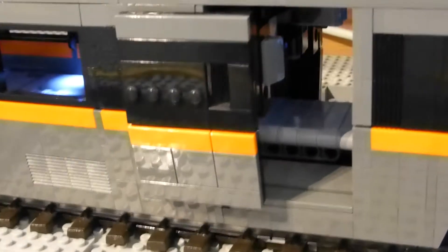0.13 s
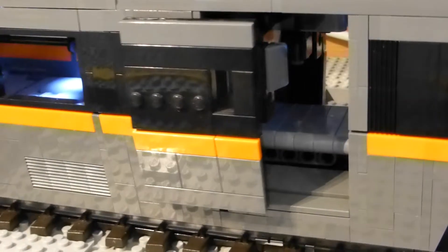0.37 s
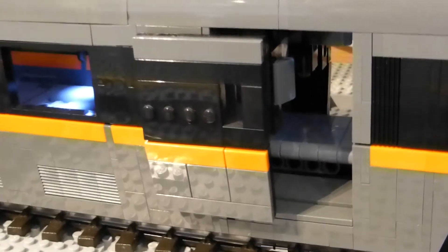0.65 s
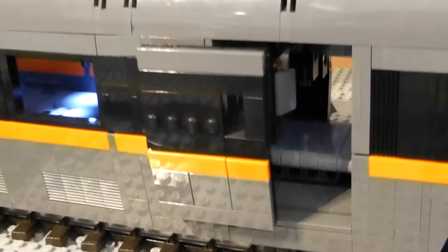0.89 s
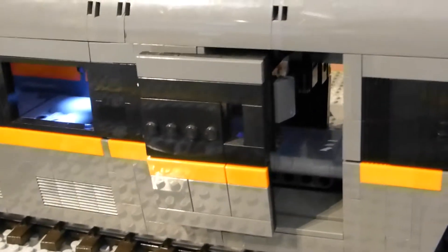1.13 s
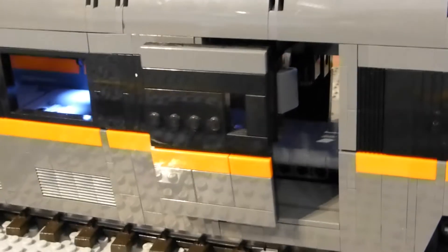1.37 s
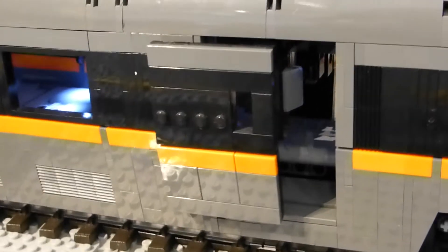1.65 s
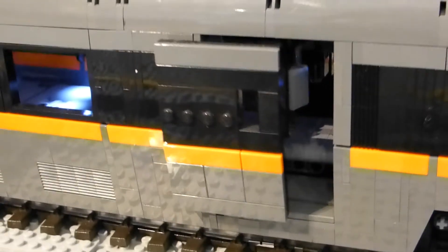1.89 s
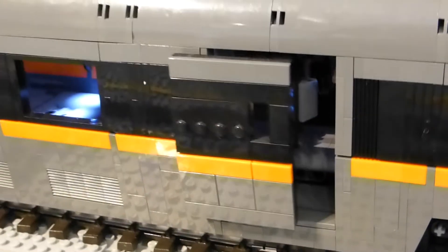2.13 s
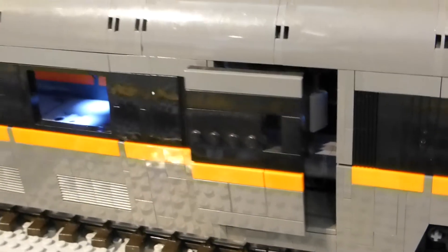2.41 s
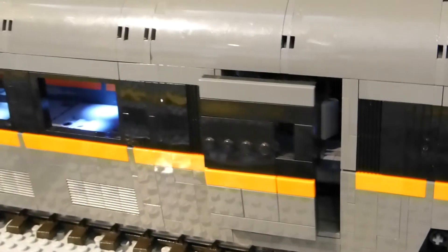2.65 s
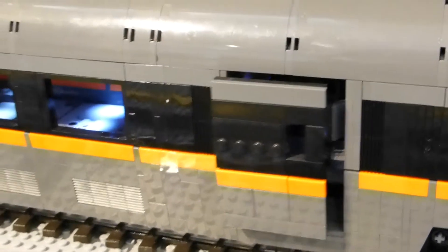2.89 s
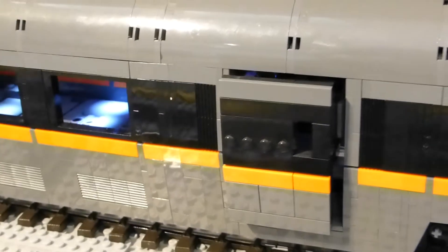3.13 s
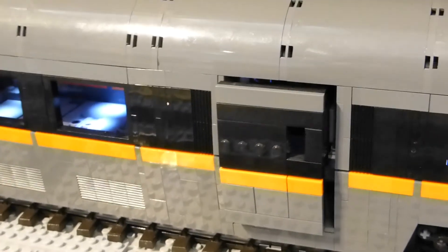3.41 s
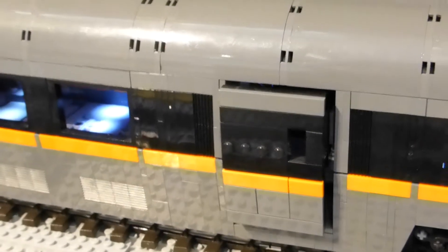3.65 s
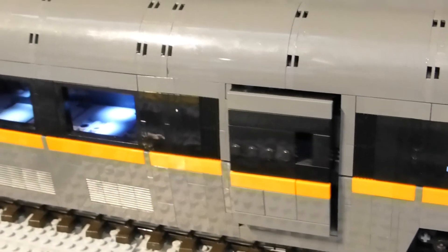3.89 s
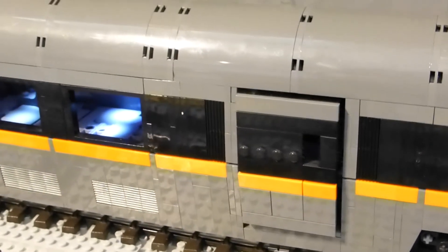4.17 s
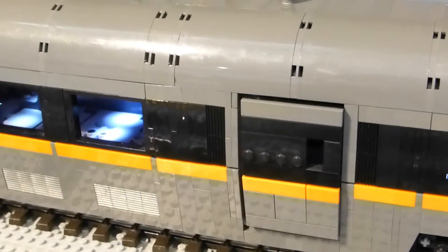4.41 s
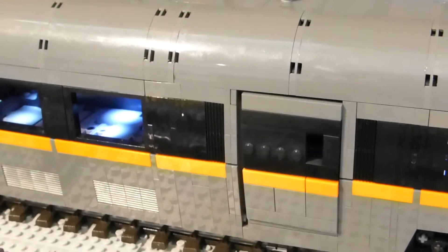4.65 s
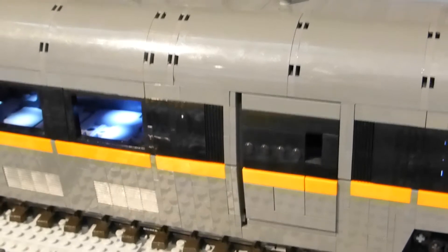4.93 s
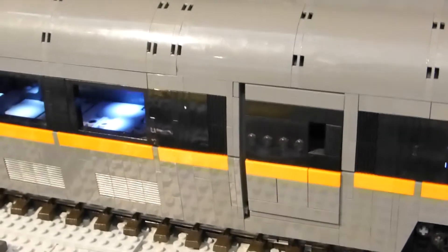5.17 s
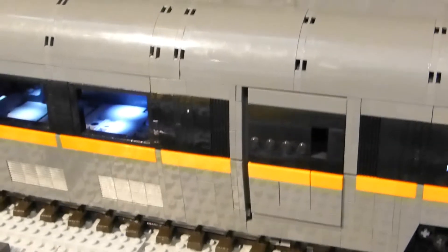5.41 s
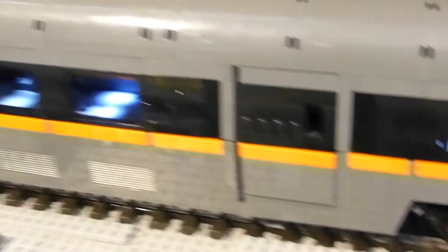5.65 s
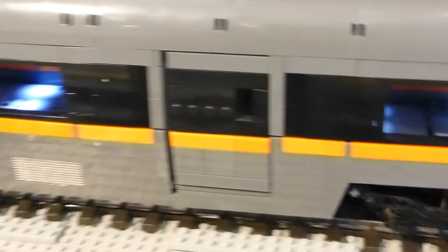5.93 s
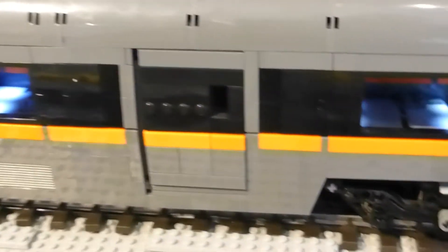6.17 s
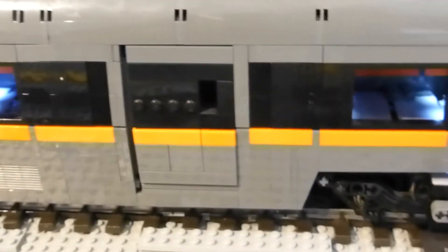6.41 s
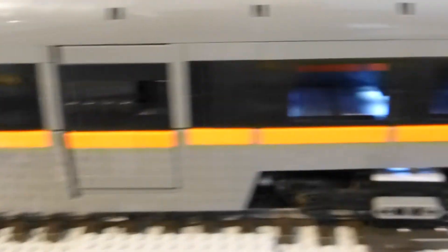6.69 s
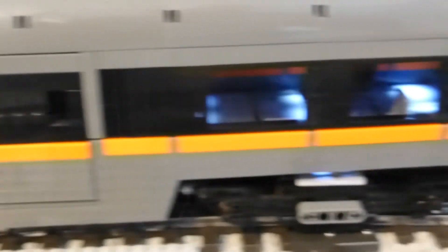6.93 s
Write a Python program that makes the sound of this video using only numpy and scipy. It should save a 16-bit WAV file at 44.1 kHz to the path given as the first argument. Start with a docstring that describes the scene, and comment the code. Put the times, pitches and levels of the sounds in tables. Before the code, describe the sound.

A small electric motor whines, stops, then whines again as a plastic model train door slides shut with clicks, followed by light plastic knocks indoors.

```python
"""A small geared motor is already whining in a plastic model carriage; it pauses, then runs again to slide a door shut.
Periodic tooth meshing makes shaft orders whose slowly drifting pattern sings through the plastic body, with brush
and gear hiss. Speed wavers with load, and races then drags at each tight spot of a slower gear.
Struck plastic modes tick, dead blows thump and thin snaps crack, over a quiet indoor hush of filtered noise."""
import sys
import numpy as np
from scipy import signal
from scipy.fft import rfft, irfft
from scipy.io import wavfile
from scipy.ndimage import uniform_filter1d

SR = 44100
rng = np.random.default_rng(int(sys.argv[2]) if len(sys.argv) > 2 else 0)


def transcribe(u):
    """Save the signal u as a 16-bit wav file named by the first command-line argument.

    u: samples, shape (n,) or (channels, n), limited to [-1, 1]; the rate is SR.
    q: integer samples, one column per channel.
    """
    v = np.clip(np.atleast_2d(u).T, -1, 1)
    q = np.round(v * 32767).astype(np.int16)
    wavfile.write(sys.argv[1], SR, q)


def to_linear_factor(level_db):
    """Convert decibel levels (scalar or array-like) to linear amplitude factors."""
    exponent = np.asarray(level_db, float) / 20
    return 10 ** exponent


N = 310905


def motor():
    """Rotating source: one shaft phase drives both the tooth whine and the tonal hum."""
    t = np.arange(N) / SR
    speed, power_db, shaft_db = powered_runs(t)
    hz, rough = loaded_shaft(t, speed)
    surge_db, lower_db = whine_levels(t)
    drive_db = WHINE_DB + power_db + surge_db
    turns = np.cumsum(hz * (1 + 0.006 * wander(24.46, count=1)[0])) / SR
    turn = np.exp(2j * np.pi * turns)
    gears = door_shading(t, wall_panels(t, carriage_body(t, turns, turn, rough)))
    lower = signal.sosfiltfilt(signal.butter(3, 1750, fs=SR, output="sos"), gears)
    # each part is levelled over 2500 samples before its own level is applied
    upper, lower = [p / np.sqrt(uniform_filter1d(p ** 2, 2500) + 1e-9) for p in (gears - lower, lower)]
    whine = to_linear_factor(drive_db) * (upper + to_linear_factor(lower_db) * lower)
    tones = order_hum(t, turn, speed, rough, drive_db, shaft_db) + chassis_shudder(t)
    # too small a body to radiate bass
    return signal.sosfilt(signal.butter(4, 105, "high", fs=SR, output="sos"), whine + tones)


# Spells of motor power: [power on t/s, power off t/s, coasting time t/s, once-a-turn hum level/dB]
RUNS = [(-.5, .41, .14, -54.5), (.93, 4.815, .185, -58.5)]
SPIN_UP_S, COAST_CURVE = .03, 1.9  # time constant of the climb; power of the coasting time
POWERED_DB, COASTING_DB = 32, 66  # whine level change per decade of speed


def powered_runs(t):
    """Rotor inertia: speed climbs exponentially under power and falls as a power law when coasting."""
    speed, power_db, shaft_db = np.full(N, 1e-4), np.full(N, -200.), np.zeros(N)
    for on, off, coast, db in RUNS:
        shaft_db[t >= on] = db
        up = np.clip(1 - np.exp(-(t - on) / SPIN_UP_S), 1e-4, 1)
        down = np.clip(1 - np.clip((t - off) / coast, 0, 1) ** COAST_CURVE, 1e-4, 1)
        speed = np.maximum(speed, up * down)
        power_db = np.maximum(power_db, POWERED_DB * np.log10(up) + COASTING_DB * np.log10(down))
    return speed, power_db, shaft_db


# Shaft speed under the changing load of the door: [t/s, shaft turns f/Hz]
CRUISE = [(0.04, 159.6), (0.21, 150.9), (0.42, 155.4), (1.05, 150.3), (1.26, 143.6), (1.64, 147.5),
          (1.81, 150), (2.16, 153.8), (2.52, 151.4), (2.68, 160.7), (2.96, 151), (3.3, 148.6),
          (3.48, 140.4), (3.86, 146.1), (4.13, 150.1), (4.36, 160.1), (4.51, 152), (4.63, 158.3),
          (4.88, 149.1)]
# A tight spot on a slower gear, round about every .29 s: [t/s, drag f/Hz, racing just before f/Hz]
CATCHES = [(0.098, 5, 2), (0.383, 10.5, 4.5), (1.141, 9.5, 7.0), (1.435, 1.75, 10), (1.737, -0.5, 6.5),
           (2.007, 5.5, 0.0), (2.285, 5.5, 0.5), (2.596, 3, 2.5), (2.862, 11, 0.5), (3.144, 15, 2.5),
           (3.432, 11, 0.6), (3.735, 7, 6), (4.036, 3, 10), (4.317, 5.5, 4.5), (4.706, 15.5, -0.5)]
DRAG_S, RACE_S, RACE_LEAD_S = .03, .028, .045
ROUGH, ROUGH_PER_HZ, ROUGH_SLOW = .2, 0.02223, 2.43  # steady, per Hz of catch, per share of lost speed
JAM_S, JAM_ROUGH = 4.69, 0.36  # the door seats and the gears grind from here on


def loaded_shaft(t, speed):
    """Load modulation: catches race and drag the shaft and roughen its running."""
    drag = sum(hz * bump(t, s, DRAG_S) for s, hz, _ in CATCHES)
    race = sum(hz * bump(t, s - RACE_LEAD_S, RACE_S) for s, _, hz in CATCHES)
    rough = ROUGH + ROUGH_PER_HZ * (drag + race) + ROUGH_SLOW * (1 - speed) + JAM_ROUGH * (t > JAM_S)
    hz = speed * (np.interp(t, *np.transpose(CRUISE)) - drag + race)
    return hz, np.clip(rough, 0, .9)


# Brief swells and dips of the whine: [t/s, half length t/s, level/dB]
SURGES = [(0.028, 0.04, 2.5), (0.212, 0.017, -2.5), (0.37, 0.086, 2.5), (1.166, 0.02, -3.5),
          (1.27, 0.12, 1), (1.48, 0.032, 3.5), (1.617, 0.009, -5), (1.825, 0.027, 3), (2.069, 0.035, 1),
          (2.229, 0.1, -2), (2.348, 0.011, -4), (2.515, 0.029, -3.5), (2.555, 0.018, 7),
          (2.596, 0.076, -4.5), (2.73, 0.041, 2.5), (2.834, 0.02, 3.5), (2.92, 0.11, -3), (3.102, 0.058, 2),
          (3.4, 0.0082, 2.5), (3.463, 0.035, -3.5), (3.822, 0.021, 3.5), (3.867, 0.012, -3.5),
          (3.895, 0.028, 2.5), (3.962, 0.027, -3.5), (4.062, 0.024, 3.5), (4.26, .015, 3),
          (4.36, 0.021, -2), (4.563, 0.075, -4), (4.702, 0.026, 4), (4.834, 0.01, 2.5),
          (4.745, 0.044, -3.5), (4.938, 0.014, 2.5), (4.883, .002, 0), (4.891, 0.0019, 4),
          (4.907, 0.0018, 9), (4.923, 0.0028, 5), (4.926, 0.0036, 1), (4.953, 0.0044, -1)]
WHINE_DB, WHINE_WAVER_DB = -28.5, 1.11
LOWER_DB, LOWER_FOLLOWS, LOWER_WAVER_DB = -4.5, 0.54, 2  # under 1.75 kHz; follows surges only partly
SHUT_S, SHUT_DB = 3.14, -2.5  # the lower part weakens as the door comes to cover the opening


def whine_levels(t):
    """Amplitude modulation: local humps and slow chance wavering, partly shared by the lower band."""
    waver = wander(27.5, count=2)
    surge_db = sum(db * bump(t, s, half_s) for s, half_s, db in SURGES) + WHINE_WAVER_DB * waver[0]
    lower_db = LOWER_DB + np.where(t > SHUT_S, SHUT_DB, 0)
    lower_db = lower_db + (LOWER_FOLLOWS - 1) * surge_db + LOWER_WAVER_DB * waver[1]
    return surge_db, lower_db


EVENNESS, EVEN_ORDER = .2, 70  # 0 = some orders stand far out, 1 = all equal; grows by 1 over 70 orders


def tooth_mesh(t, turn, rough):
    """Fourier synthesis: 90 shaft orders carry a tooth pattern that drifts, and blurs when rough."""
    frames, rough_frames = np.arange(0, N + 64, 64) / SR, np.append(rough[::64], 0)
    rough_frames = rough_frames[:len(frames)]
    order = np.arange(90)
    z = rng.standard_normal((4, len(frames), 90))
    z = z + 0.17 * np.roll(z, 1, axis=2)  # neighbouring orders move together: a soft beat once a turn
    slow = smooth_frames(z[0] + 1j * z[1], 5)
    slip = np.cumsum(1.3 + 10 * rough_frames ** 2)  # the pattern moves faster when the mesh jolts
    slow = np.r_[slow, slow[::-1]][(slip % (2 * len(frames))).astype(int)]
    slow = slow / abs(slow) ** np.clip(EVENNESS + order / EVEN_ORDER, 0, 1)
    fast = smooth_frames(z[2] + 1j * z[3], 40)
    loose = np.clip(rough_frames[:, None] * (0.45 + (order / 23) ** 2), 0, 1)  # high orders blur first
    pattern = np.sqrt(1 - loose) * slow / abs(slow).mean()
    pattern = pattern + .5 * np.sqrt(loose) * fast / abs(fast).mean()
    chatter = smooth_frames(rng.standard_normal(pattern.shape), 12)
    pattern *= to_linear_factor(2.24 * evened(uniform_filter1d(chatter, size=4)))  # groups of orders flare up briefly
    teeth, carrier = np.zeros(N), np.ones(N, complex)
    for column in pattern.T:
        carrier = carrier * turn
        teeth += (carrier * np.interp(t, frames, column)).real
    return evened(teeth)


def smooth_frames(z, cutoff_hz):
    """Low-pass smoothing of curves sampled every 64 samples."""
    b, a = signal.butter(2, cutoff_hz * 128 / SR)
    return signal.filtfilt(b, a, z, axis=0, padtype="even", padlen=600)


TOOTH_DB, TOOTH_SPREAD_DB = -6, 3.5  # level against the mesh; spread of single teeth
TOOTH_DRIFT, TOOTH_JITTER = .17, .003  # slow shift in turns; quick shift in turns at 150 Hz


def tooth_clicks(turns, count=3):
    """Once-per-turn impulses: proud teeth strike at places that creep round; each comes and goes."""
    out, chance = np.zeros(N), rng.standard_normal((count, 2, N))
    creeps, strengths = wander(1.5, count), wander(10.4, count)
    for k, (creep, strength, (shift, size)) in enumerate(zip(creeps, strengths, chance)):
        at = np.flatnonzero(np.diff(np.floor(turns + k / count + TOOTH_DRIFT * creep)))
        late = np.clip(at + (TOOTH_JITTER * shift[at] * SR / 150).astype(int), 0, N - 1)
        out[late] -= to_linear_factor(TOOTH_SPREAD_DB * np.minimum(strength[at], 1.5) + np.clip(size[at], -2, 2))
    return out - out.mean()


# Brush and gear hiss relative to the body colour: [f/Hz, level/dB]
RATTLE = [(100, 14), (400, 8), (1000, -2.5), (2500, 1), (5000, 9), (10000, 5.5), (15400, 4)]


def brush_hiss(turn):
    """Modulated noise: friction hiss gated once a turn and in uneven bursts of grinding."""
    gate = (1 + 0.031 * turn.real) * to_linear_factor(0.91 * wander(79, count=1)[0])
    return colour(gate * rng.standard_normal(N), RATTLE)


# What the carriage radiates: [f/Hz, level/dB]
BODY = [(150, -37), (400, -27.5), (700, -7), (1200, -4.5), (1700, -4), (2300, 0), (2750, -8.5), (3100, -13),
        (3700, -13), (4150, -11.5), (4700, -12.5), (5250, -14.5), (6400, -17), (7200, -18), (8000, -17.5),
        (10000, -18), (11500, -30), (15200, -32), (15450, -67)]


def carriage_body(t, turns, turn, rough):
    """Source and filter: the plastic body colours teeth and hiss; rough running favours hiss."""
    teeth = tooth_mesh(t, turn, rough) + to_linear_factor(TOOTH_DB) * evened(tooth_clicks(turns))
    share = np.clip(0.1 + 0.5 * rough, 0, 1)  # power share of the hiss
    hiss = evened(colour(brush_hiss(turn), BODY))
    return np.sqrt(1 - share) * evened(colour(teeth, BODY)) + np.sqrt(share) * hiss


# Narrow resonances and dips of the plastic walls:
# [f/Hz, width f/Hz, door open level/dB, door over the gears level/dB]
PANELS = [(899, 75, -5, -2), (1377, 95, 7, 6), (1561, 70, 6.5, 3.5), (1702, 64, -14.5, -3),
          (1822, 370, 8, 3.5), (2057, 66, 4, 4), (2356, 200, 1.5, 4), (2680, 260, 6.5, 3),
          (2784, 103, -9.5, 2), (2964, 110, 7.5, 1.5), (3260, 130, 5.5, 3), (3865, 210, -6, 0),
          (3990, 145, 6, 1), (4200, 51, 2, 9.5), (4500, 150, -1, -4), (5205, 170, 1.5, 7),
          (5430, 65, 7.5, -8), (6410, 120, 6.5, 5.5), (6700, 100, 2, 8.5), (6670, 74, 5, -4.5),
          (6930, 190, -4, -6), (7850, 140, 3.5, 5.5)]
# The door slides over the gears: [start t/s, end t/s]
COVER_S = (2.3, 3.9)


def wall_panels(t, gears):
    """Panel resonance: Lorentzian peaks and dips cross-fade from open door to covered gears."""
    grid_hz = np.arange(50, 16000, 15.)
    peaks_db = sum(np.outer(db, 1 / (1 + (2 * (grid_hz - f) / width) ** 2)) for f, width, *db in PANELS)
    covered = np.interp(t, COVER_S, (0, 1))
    shares = (1 - covered, covered)
    return sum(share * colour(gears, np.c_[grid_hz, db]) for share, db in zip(shares, peaks_db))


# Treble gain of the whine, dulling after 2 s as the door closes over the gears: [t/s, level/dB]
SHINE = [(0, 1.5), (.5, 1), (2, 5), (3, 0), (5, -0.5)]
# Bands whose brightness changes as the door slides over the gears:
# [low f/Hz, high f/Hz, before level/dB, after level/dB, change t/s]
RASPS = [(2570, 3160, 6, 3, 2.28), (2200, 2650, 0.5, 2, 3.9), (4730, 5100, 0, 2, 2.6)]
RASP_FADE_S = 0.043  # half length of each change


def door_shading(t, gears):
    """Time-varying filtering: the treble and three narrower bands change level as the door moves."""
    treble = signal.sosfiltfilt(signal.butter(3, 2550, "high", fs=SR, output="sos"), gears)
    gears = gears + (to_linear_factor(np.interp(t, *np.transpose(SHINE))) - 1) * treble
    for low_hz, high_hz, before_db, after_db, s in RASPS:
        band = signal.butter(2, (low_hz, high_hz), "band", fs=SR, output="sos")
        rasp = signal.sosfiltfilt(band, gears)
        gain_db = np.interp(t, (s - RASP_FADE_S, s + RASP_FADE_S), (before_db, after_db))
        gears = gears + (to_linear_factor(gain_db) - 1) * rasp
    return gears


# Shaft orders heard as tones: [multiple of the shaft turns]
HUM_ORDERS = (2, 3, 4, 5, 6, 7, 8, 10, 12, 14, 17)
# Resting level of each of those orders: [level/dB]
HUM_DB = (-60.5, -62, -50, -50, -60, -53.5, -67, -60, -55, -52, -54)
# Moments when one order stands out, a table per order: [t/s, half length t/s, level/dB]
FLARES = [
    [(1.277, 0.089, -53), (2.494, 0.12, -57.5), (3.47, 0.062, -53), (3.78, 0.3, -59), (4.121, 0.065, -57),
     (4.705, 0.024, -43.5)],
    [(3.3, 0.2, -64), (4.1, 0.062, -55)],
    [(.12, 0.21, -48.5), (.309, 0.025, -38.5), (2.075, 0.062, -44.5), (2.55, 0.016, -34),
     (2.64, 0.048, -36), (2.814, 0.022, -38.5), (3.05, 0.088, -52), (4.01, 0.016, -41),
     (4.639, 0.03, -34.5)],
    [(1.307, 0.029, -51), (1.6, 0.33, -55), (2.12, 0.016, -45), (2.654, 0.016, -42), (3.68, 0.081, -48),
     (3.85, 0.048, -44), (4.045, 0.033, -39), (4.49, 0.031, -43), (4.8, 0.04, -44)],
    [(2.72, 0.022, -52.5), (3.27, 0.058, -44.5), (3.86, 0.053, -61)],
    [(.309, 0.27, -46), (1.09, 0.012, -40), (1.28, 0.044, -42), (1.8, 0.079, -50), (2.095, 0.019, -32),
     (2.434, 0.068, -33.5), (2.744, 0.073, -41), (3.03, 0.069, -41), (3.54, 0.042, -50), (4.39, 0.051, -44),
     (4.629, 0.031, -38)],
    [(1.48, 0.026, -42), (2.09, 0.11, -39.5), (2.93, 0.017, -66), (4.4, 0.089, -42)],
    [(1.06, 0.019, -30.5), (1.77, 0.046, -39), (3.08, .03, -36)],
    [(.11, 0.028, -32), (.425, .025, -36), (1.77, .03, -38), (2.1, 0.035, -29), (3.08, .03, -38),
     (4.4, 0.023, -35)],
    [(.1, 0.023, -29), (1.26, 0.015, -49), (3.08, 0.038, -29.5)],
    [(.03, 0.017, -24), (.17, 0.034, -37)],
]
HUM_WAVER_DB, HUM_SLOW_DB = 3, 105  # slow wavering; loss per decade of speed


def order_hum(t, turn, speed, rough, drive_db, shaft_db):
    """Harmonics of rotation: low shaft orders sound as tones, broken up by rough running."""
    flutters = 7 * rough * wander(37, count=len(HUM_ORDERS))
    drifts = wander(3.6, count=len(HUM_ORDERS))
    hum = np.zeros(N)
    for k, db, flares, drift, flutter_db in zip(HUM_ORDERS, HUM_DB, FLARES, drifts, flutters):
        level = to_linear_factor(db + HUM_WAVER_DB * drift)
        level = level + sum(to_linear_factor(top_db) * bump(t, s, half_s) for s, half_s, top_db in flares)
        order_db = 20 * np.log10(level) + HUM_SLOW_DB * np.log10(speed)
        hum += np.sqrt(2) * to_linear_factor(order_db + flutter_db) * (turn ** k).imag
    once_db = shaft_db + .5 * (drive_db + 26) - 3 * rough + 1.5 * wander(8, count=1)[0]
    return hum + np.sqrt(2) * to_linear_factor(once_db) * turn.imag


# Chassis shudder at part speed:
# [f/Hz, level/dB, after power on t/s, after power off t/s, half length t/s]
SHUDDER = (243, -50.5, .05, .066, .022)


def chassis_shudder(t):
    """Resonance in passing: a fixed tone swells briefly after each power on and off."""
    hz, db, after_on, after_off, half_s = SHUDDER
    swell = sum(bump(t, on + after_on, half_s) + bump(t, off + after_off, half_s) for on, off, *_ in RUNS)
    return np.sqrt(2) * to_linear_factor(db + 2.5 * wander(25, count=1)[0]) * swell * np.sin(2 * np.pi * hz * t)


# Ticks and knocks of plastic parts:
# [t/s, overall level/dB, struck place f/Hz, bright crack relative level/dB]
TICKS = [(0.572, -49, 5900, 5), (0.755, -49, 1640, 2), (0.829, -40.5, 1660, 0.5), (4.994, -50, 1660, 6),
         (5.057, -48.5, 222, -37), (5.224, -43, 1430, 1), (5.231, -35.5, 3180, 3.5), (5.25, -36, 425, -18),
         (5.307, -47, 2180, 4), (5.341, -39.5, 964, -6), (5.344, -35, 3040, 1.5), (5.347, -36, 2140, -15),
         (5.3705, -42, 2800, 2), (5.885, -53, 4200, 4), (5.985, -46, 5900, -3), (6.0112, -42, 2900, -4),
         (6.535, -30.5, 547, -6.5), (6.5373, -37, 2860, 0), (6.5367, -25, 413, -5.5),
         (6.549, -32, 530, -31), (6.596, -47, 4100, -3), (6.574, -36, 416, -20), (6.588, -36, 2700, -2.5),
         (6.593, -33, 158.4, -30), (6.5933, -44, 2840, -1), (6.606, -50, 3040, 3), (6.749, -32, 423, -8),
         (6.7483, -41, 2200, -8), (6.751, -38, 4200, -6), (6.756, -45, 170, -25), (6.766, -53, 4200, -9),
         (6.838, -52, 2200, 3), (6.845, -45, 179, -30), (6.868, -49, 172, -30)]
# Modes of the plastic shell, struck at different places: [f/Hz, level/dB, 60 dB decay t/s]
SHELL = [(170, 0.5, 0.15), (222, 5, 0.076), (364, -1.5, .05), (425, -3.5, 0.072), (539, 3, 0.056),
         (660, 1, .04), (964, 7.5, 0.018), (1430, 4.5, 0.052), (1660, 4.5, 0.024), (2200, -0.5, 0.026),
         (2700, -8, .03), (2900, -4, 0.02), (3040, 1, 0.019), (4200, -8, .03), (5900, -3, .03)]
REACH_OCTAVES, SOFT_CYCLES = 0.085, 0.9  # how far from the struck place modes answer; rise of the ring
PUFF_DB, PUFF_DB_PER_OCTAVE = -4.5, -9  # dull puff of a tick at 500 Hz, weaker away from it


def ticks():
    """Modal impact: each tick rings shell modes near the struck place, with a puff and a crack."""
    out, t = np.zeros(N + 6000), np.arange(6000) / SR
    noise = rng.standard_normal((len(TICKS), 6000))
    dull = signal.sosfilt(signal.butter(3, (280, 900), "band", fs=SR, output="sos"), noise)
    dull = dull * to_linear_factor(-60 * t / 0.079)
    bright = signal.sosfilt(signal.butter(2, (900, 5000), "band", fs=SR, output="sos"), noise)
    bright = bright * (to_linear_factor(-60 * t / 0.015) + to_linear_factor(-10.0 - 60 * t / 0.12))
    mode_hz, mode_db, t60 = np.transpose(SHELL)[:, :, None]
    modes = to_linear_factor(mode_db - 60 * t / t60) * np.sin(2 * np.pi * mode_hz * t)
    modes = modes * np.minimum(t * mode_hz / SOFT_CYCLES, 1)
    for (s, level_db, hz, bright_db), puff, crack in zip(TICKS, dull, bright):
        ring = bump(np.log2(mode_hz[:, 0] / hz), 0, REACH_OCTAVES) @ modes
        dull_db = PUFF_DB + PUFF_DB_PER_OCTAVE * abs(np.log2(hz / 500))
        tick = ring + to_linear_factor(dull_db) * puff / abs(puff).max() + to_linear_factor(bright_db) * crack / abs(crack).max()
        out[round(s * SR):][:6000] += to_linear_factor(level_db) * tick * np.minimum(t / .001, 1)
    return signal.sosfilt(signal.butter(2, 110, "high", fs=SR, output="sos"), out[:N])


# Short dry thumps: [t/s, starting level/dB, f/Hz, 60 dB decay t/s]
THUMPS = [(4.73, -36, 480, 0.037), (4.845, -37, 400, .04), (4.994, -37, 1304, .008),
          (4.928, -33.5, 560, 0.056), (4.946, -34, 710, 0.022), (4.9952, -32, 476, 0.017),
          (5.0178, -30, 600, 0.012), (5.059, -39, 389, 0.024)]
# Thin bright snaps: [t/s, nominal level/dB, 60 dB decay t/s]
SNAPS = [(4.9273, -27, 0.052), (4.9945, -42, .008), (5.2244, -37, 0.018), (5.2305, -31, 0.035),
         (5.3424, -48, .03), (5.9848, -41, 0.024), (6.5365, -35, 0.033)]


def thumps():
    """Heavy damping: dead blows are fast-dying sines, thin snaps are fast-dying treble noise."""
    out, t = np.zeros(N + 3000), np.arange(3000) / SR
    treble = signal.butter(2, (5500, 13000), "band", fs=SR, output="sos")
    noise = signal.sosfilt(treble, rng.standard_normal((len(SNAPS), len(t))))
    for s, start_db, hz, t60 in THUMPS:
        out[round(s * SR):][:len(t)] += to_linear_factor(start_db - 60 * t / t60) * np.sin(2 * np.pi * hz * t)
    for (s, level_db, t60), snap in zip(SNAPS, noise):
        rise = np.minimum(t / 0.00056, 1)
        out[round(s * SR):][:len(t)] += to_linear_factor(level_db - 60 * t / t60) * snap * rise / 2
    return signal.sosfilt(signal.butter(2, 200, "high", fs=SR, output="sos"), out[:N])


# Stereo lean of the direct sound: [f/Hz, left minus right level/dB]
LEAN = [(60, -2), (180, 0), (550, 0), (1650, -2), (4970, -1), (15000, 0)]


def room(x, t60=0.19, level_db=-11):
    """Reverberation: direct sound with a stereo lean, and sparse dying reflections that differ per ear."""
    taps = np.zeros((2, 12000))
    at = np.arange(60, 11980, 20) + rng.integers(0, 20, (2, 596))
    np.put_along_axis(taps, at, rng.choice([-1., 1.], at.shape), 1)
    taps *= to_linear_factor(-60 * np.arange(12000) / SR / t60)
    tail = signal.fftconvolve(x[None], taps / np.linalg.norm(taps[0]), axes=1)[:, :N]
    direct = [colour(x, [(f, side * db / 2) for f, db in LEAN]) for side in (1, -1)]
    # hard walls return the treble
    return np.array(direct) + to_linear_factor(level_db) * (tail + 0.8 * np.diff(tail, prepend=0))


# Relative spectrum of the hush: [f/Hz, level/dB per Hz]
HUSH = [(15, -65), (25, -23), (69, -39), (101, -23), (169, -15.5), (204, -13), (322, -14), (536, -8),
        (701, -4.5), (802, -14.5), (1450, -12), (1850, -15.5), (3080, -17.5), (3620, -19.5), (15400, -24)]
# The low hush comes and goes: [t/s, level/dB]
SWELL = [(.5, 7.5), (.9, 3.5), (5.0, 10.5), (5.25, 4), (5.85, 7), (6.2, 3), (6.7, 3), (6.87, 6),
         (7.05, 2.5)]
# Left-right likeness of the hush: [f/Hz, correlation from -1 to 1]
SAME = [(60, .6), (180, 0.74), (550, 0.57), (1650, -0.59), (4970, 0.25), (15000, 0.34)]
HUSH_DB = -53  # rms


def hush():
    """Filtered noise: air and microphone hiss from random short-time spectra, its low part swelling."""
    frames, hz = N // 256 + 5, np.fft.rfftfreq(1024, 1 / SR)
    a, b, c, d, patches = rng.standard_normal((frames, 513, 5)).T
    patches = evened(uniform_filter1d(uniform_filter1d(patches, 8, 0), 8, 1))
    swell_db = np.interp(np.arange(frames) * 256 / SR, *np.transpose(SWELL))
    low = 1 / (1 + (hz[:, None] / 1800) ** 2)  # the room part swells, the high hiss stays nearly steady
    same, left = np.clip(read(SAME, hz), -1, 1)[:, None], a + 1j * b
    right = same * left + np.sqrt(1 - same ** 2) * (c + 1j * d)
    z = np.array([left, right])
    z *= to_linear_factor(read(HUSH, hz)[:, None] + low * (1.8 * patches + swell_db))
    return to_linear_factor(HUSH_DB) * evened(signal.istft(z, nperseg=1024, noverlap=768)[1][:, :N])


def evened(x):
    """Power normalisation: scales to rms 1."""
    return x / np.sqrt(np.mean(x ** 2) + 1e-20)


def read(points, hz):
    """Logarithmic pitch scale: reads a table on a log-frequency axis."""
    f, value = np.transpose(points)
    return np.interp(np.log(hz + 1), np.log(f + 1), value)


def colour(x, points):
    """Minimum phase: a causal filter with the spectrum of the table."""
    gain_db = np.maximum(read(points, abs(np.fft.fftfreq(4096, 1 / SR))), -100)
    log_gain = np.log(to_linear_factor(gain_db))
    taps = np.fft.ifft(np.exp(np.conj(signal.hilbert(log_gain)))).real[:2048]
    return signal.oaconvolve(x, taps)[:len(x)]


def wander(rate_hz, count):
    """Low-passed noise: slow chance curves of rms 1."""
    z = rng.standard_normal((count, N // 100 + 2))  # one point every 100 samples
    b, a = signal.butter(2, rate_hz * 200 / SR)
    smooth = signal.filtfilt(b, a, z, padtype="even", padlen=600)
    return np.array([np.interp(np.arange(N) / 100, np.arange(len(s)), evened(s)) for s in smooth])


def bump(t, s, half_s):
    """Gaussian envelope: a smooth hump of height 1."""
    return np.exp(-((t - s) / half_s) ** 2)


def scene():
    """Superposition: motor, ticks and thumps in the room, over the hush."""
    return room(motor() + ticks() + thumps()) + hush()


def roll_off(x):
    """The treble ends steeply here."""
    return signal.sosfilt(signal.butter(12, 15600, fs=SR, output="sos"), x)


# Dip of the microphone port: [f/Hz, width f/Hz, level/dB]
NOTCH = (9100, 230, -13)


def record(dry):
    """Port anti-resonance: the microphone port weakens a narrow band."""
    hz, (centre_hz, width_hz, db) = np.fft.rfftfreq(N, 1 / SR), NOTCH
    heard = irfft(rfft(dry) * to_linear_factor(db * bump(hz, centre_hz, width_hz)), N)
    return roll_off(heard)


dry = scene()
out = record(dry)
transcribe(out)
```